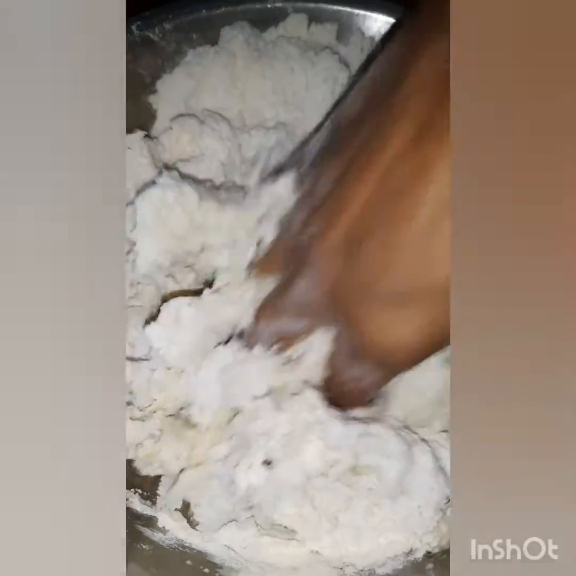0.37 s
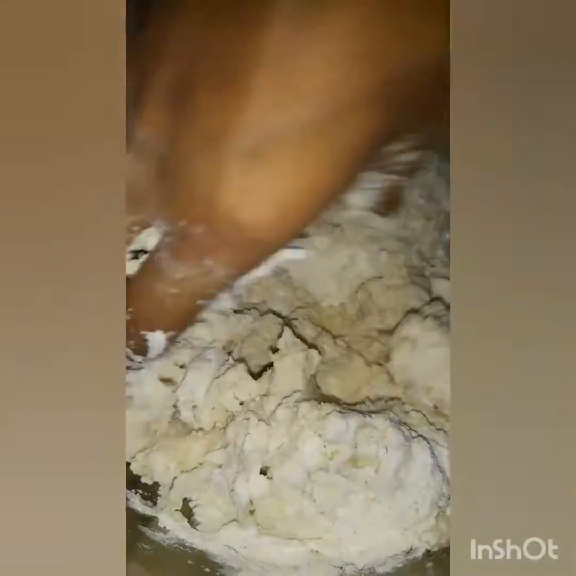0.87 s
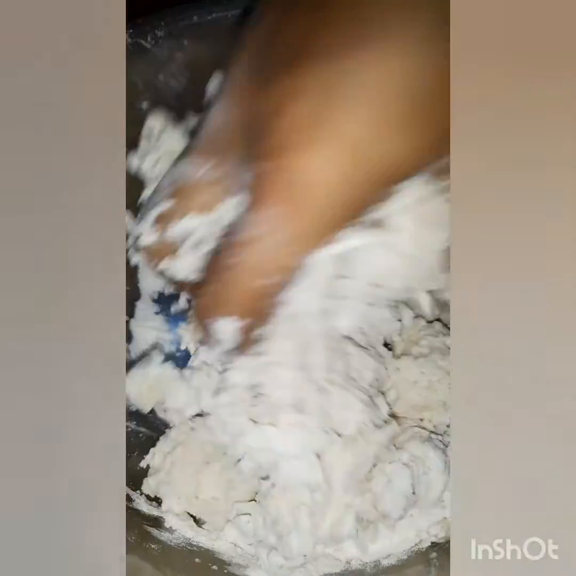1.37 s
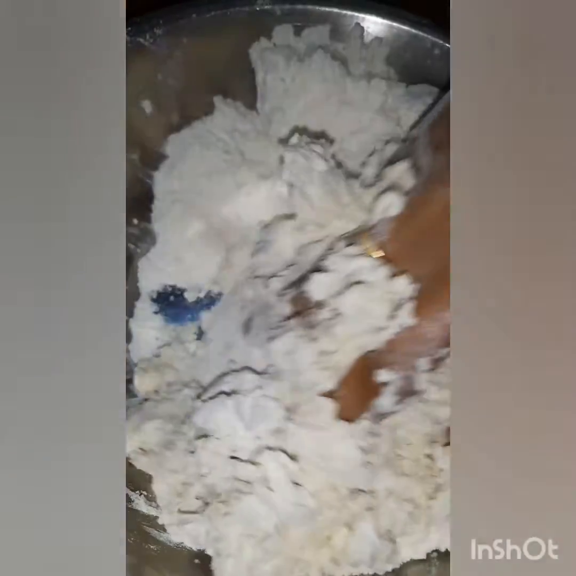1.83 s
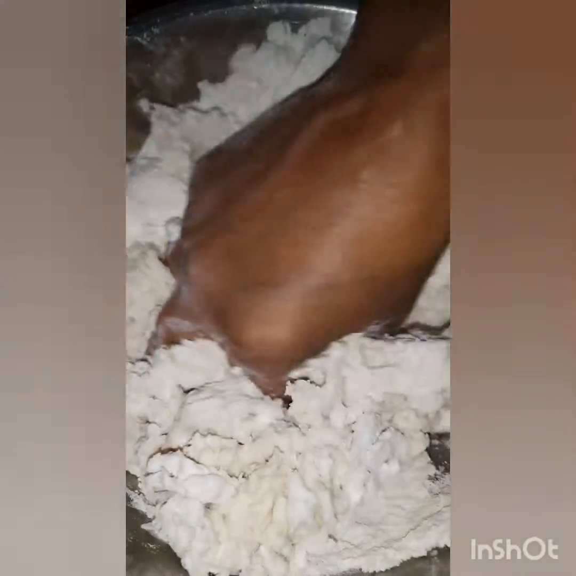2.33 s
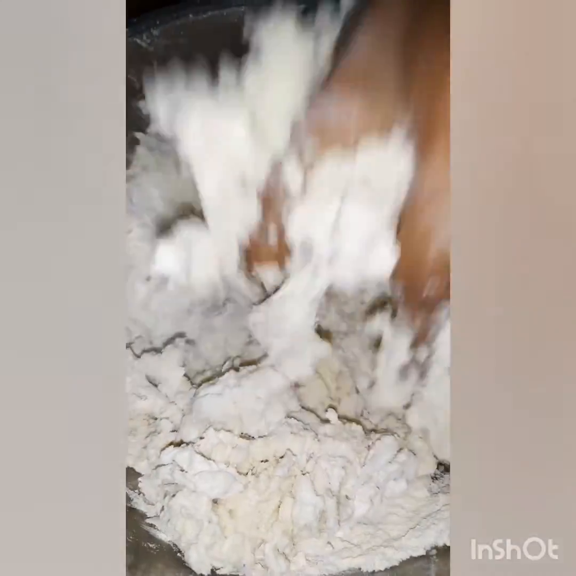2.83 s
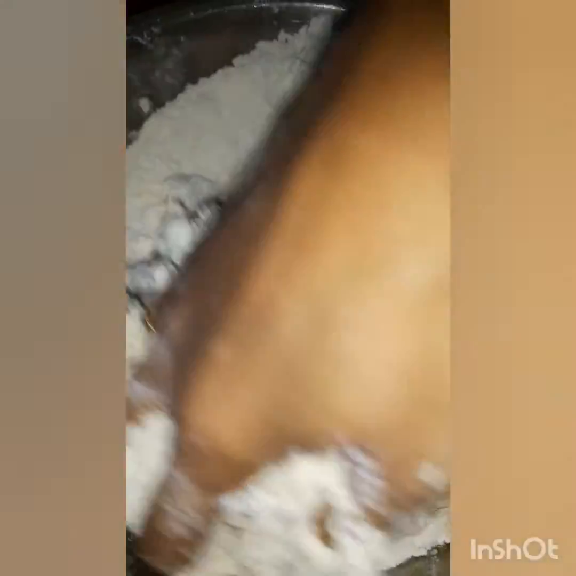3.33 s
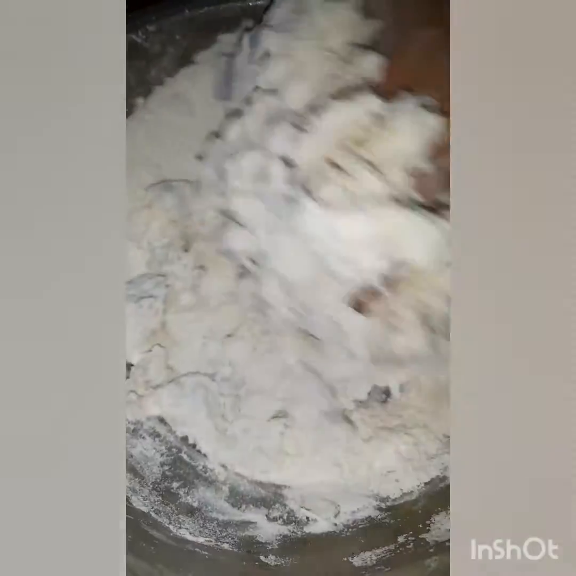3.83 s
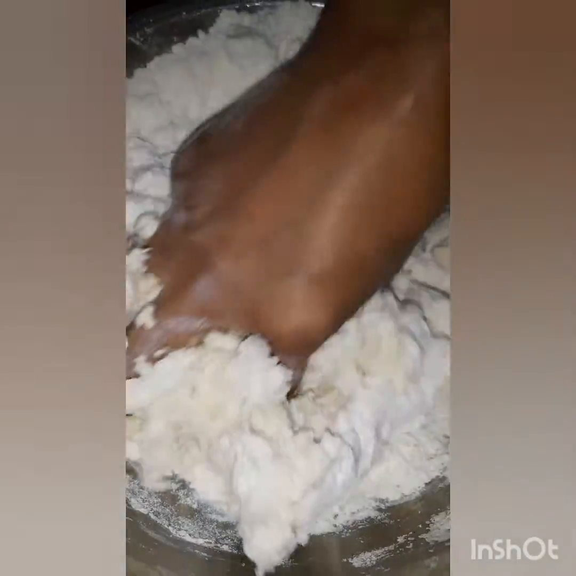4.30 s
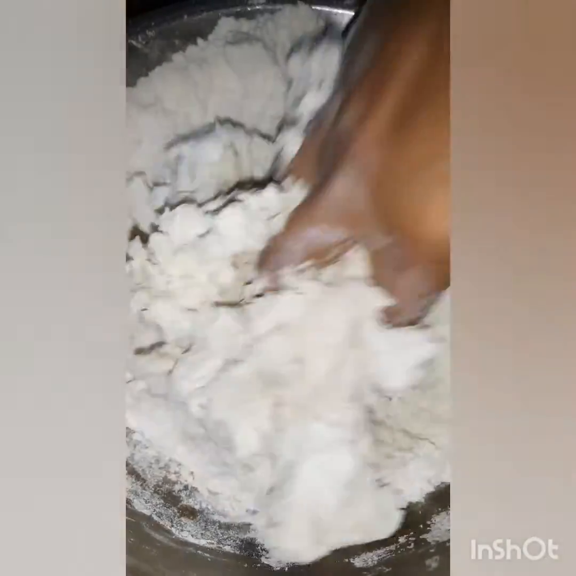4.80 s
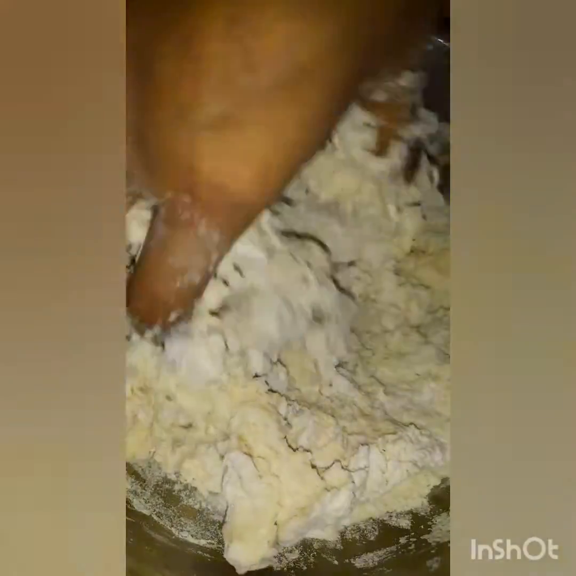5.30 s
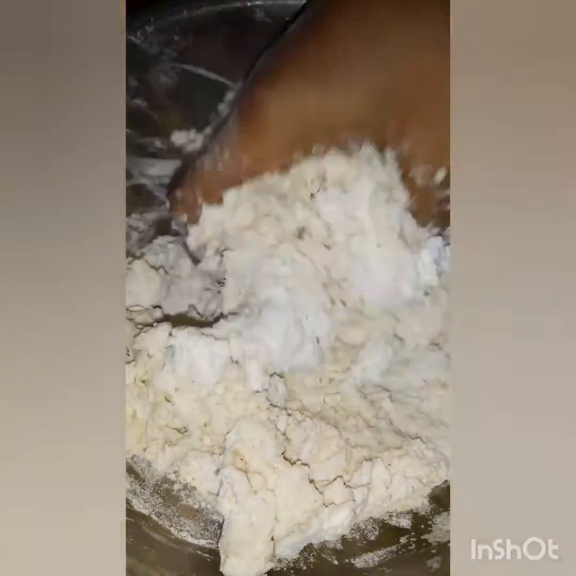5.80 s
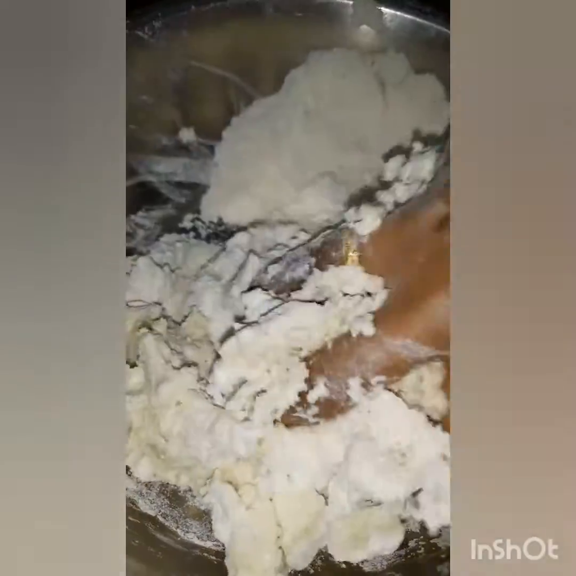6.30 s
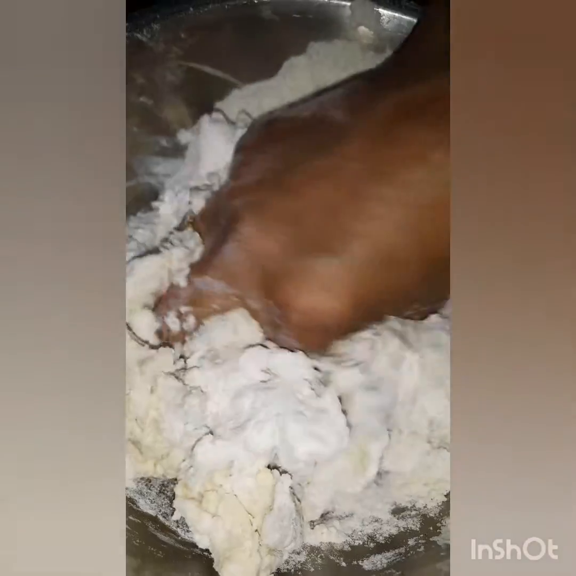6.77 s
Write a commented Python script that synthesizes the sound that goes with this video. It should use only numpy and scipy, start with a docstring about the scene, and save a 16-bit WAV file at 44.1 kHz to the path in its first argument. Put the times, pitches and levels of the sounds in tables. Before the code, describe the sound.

Close up in a quiet kitchen, a hand works crumbly dough in a steel bowl. Gritty strokes rustle and scrape in uneven bursts, dry crumbs crack, and the bowl knocks and thuds on the counter. Off to the right, something hard is tapped with a short ring and slight reverberation, in runs of about five a second. A low room hum stays underneath, and a faint squeak comes at the end.

```python
"""A hand kneads crumbly dough in a steel bowl on a kitchen counter, close to a two-port microphone. From the
start crumbs rustle and scrape on the steel (gritty noise under stroke envelopes) over a low hum; soon crumbs
crack, the bowl wall knocks and something clicks close on the right (short damped swings), and something hard is
tapped further off to the right, in runs about five a second (ringing clicks and reverberation). Then the bowl
thuds and booms (decaying modes), a palm swishes (resonant noise) and near the end a faint squeak joins (two
noise bands)."""
import sys
import numpy as np
from scipy import signal
from scipy.fft import rfft, irfft, next_fast_len
from scipy.io import wavfile
from scipy.ndimage import uniform_filter1d

SR = 44100
rng = np.random.default_rng(int(sys.argv[2]) if len(sys.argv) > 2 else 0)


def invert_db(level):
    """Linear amplitude ratio for a level in decibels (20 dB per decade), elementwise."""
    return 10 ** (np.asarray(level, dtype=float) / 20)


def log_audio(samples):
    """Write samples as a 16-bit WAV file to the path given in sys.argv[1]."""
    # one column per channel
    frames = np.atleast_2d(samples).T
    # limit to full scale, then quantise
    limited = np.clip(frames, -1, 1)
    pcm = np.round(limited * 32767).astype(np.int16)
    wavfile.write(sys.argv[1], SR, pcm)


N = 315314
SIZE = next_fast_len(N + SR)
HZ = np.arange(SIZE // 2 + 1) * SR / SIZE + 1  # 1 Hz up, so that log(HZ) exists


def on_hz(table):
    """A (hz, value) table interpolated over log frequency."""
    hz, value = np.transpose(table)
    return np.interp(np.log(HZ), np.log(hz), value)


def colour(x, gain):
    """Filter by a gain per frequency."""
    return irfft(rfft(x, SIZE) * gain, SIZE)[..., :N]


def unit(x):
    """Scale to rms 1."""
    return x / np.sqrt(np.mean(x ** 2))


def resonances(table):
    """Response of (hz, width_hz, level_db) resonators summed with alternating sign."""
    response = 0
    for k, (hz, width_hz, db) in enumerate(table):
        damping = 1j * HZ * width_hz
        response = response + (-1) ** k * invert_db(db) * damping / (hz ** 2 - HZ ** 2 + damping)
    return response


def as_widths(modes):
    """Decay times turned into resonance widths."""
    return [(hz, np.log(1000) / np.pi / t60_s, db) for hz, db, t60_s in modes]


def walk(rate_hz):
    """Random levels held 1 / rate_hz s and slewed twice."""
    k = int(SR / rate_hz)
    held = np.repeat(rng.standard_normal(N // k + 1), k)
    return uniform_filter1d(uniform_filter1d(held, k), k)[:N]


def grit(rate_hz, spread_db, share, decay_s):
    """Two unrelated noises, partly gated by the same random breaks of crumbs of unequal size."""
    breaks = rng.random(N) < rate_hz / SR
    size = breaks * invert_db(spread_db * np.minimum(rng.exponential(size=N), 4))
    burst = signal.lfilter([1], [1, -np.exp(-1 / (decay_s * SR))], size)
    return rng.standard_normal((2, N)) * (1 - share + share * unit(burst))


def envelope(full_s, hold_s, db, rise_db_s, sag_db_s, release_db_s):
    """Events that rise, sag while held and die away, added in power; one value per 64 samples."""
    t = np.arange(N // 64 + 2)[:, None] * 64 / SR - full_s
    rise = rise_db_s * np.minimum(t, 0)
    sag = sag_db_s * np.clip(t, 0, hold_s)
    release = release_db_s * np.maximum(t - hold_s, 0)
    gain = np.sqrt(np.sum(invert_db(db + rise - sag - release) ** 2, axis=1))
    return np.interp(np.arange(N) / 64, np.arange(len(t)), gain)


def add(out, s, x):
    """Mix a sound in at a time."""
    i = int(s * SR)
    out[..., i:i + x.shape[-1]] += x[..., :N - i]


def tail(t60_s, rise_s):
    """Two unrelated noise decays that build up as reflections arrive."""
    t = np.arange(SR // 2) / SR
    return rng.standard_normal((2, len(t))) * (1 - np.exp(-t / rise_s)) * invert_db(-60 * t / t60_s)


# likeness of the two ports: hz, correlation (0-1)
PORT_LIKENESS = [(30, 1), (90, 0.92), (300, 0.86), (600, 0.23), (1200, 0.07), (2500, 0.06), (8000, 0)]
# colour of the ports: hz, left_minus_right_db
PORT_TILT = [(60, -8), (110, 0.0), (200, -1.5), (380, -2), (700, 2.5), (1290, 1.0), (2380, -8.5),
             (4400, -2), (8120, 3), (15000, 2.5)]
ROOM_LAG_S = 0.00008  # diffuse sound reaches the left port first


def ports(pair):
    """A shared and a differing part reach the two ports, with their own lag and colour."""
    angle = np.arccos(np.clip(on_hz(PORT_LIKENESS), 0, 1)) / 2
    shared, other = rfft(pair, SIZE) * np.array([np.cos(angle), np.sin(angle)])
    lean = invert_db(on_hz(PORT_TILT) / 2) * np.exp(1j * np.pi * HZ * ROOM_LAG_S)
    return irfft(np.array([(shared + other) * lean, (shared - other) / lean]), SIZE)[:, :N]


# strokes of the hand through the dough: full_s, hold_s, fine_rustle_db, coarse_rustle_db, scrape_db
STROKES = [(0.0, 0.0082, -61, -56.5, -57.5), (0.14, 0.11, -74.5, -73, -83.5),
           (0.33, 0.13, -58, -66.5, -65.5), (0.88, 0.078, -64.5, -78, -84),
           (0.991, 0.121, -52.5, -57.5, -53.5), (1.142, 0.081, -54, -56, -59), (1.4, 0.45, -83, -81.5, -90),
           (1.8, 0.15, -65, -65, -69.5), (1.92, 0.14, -63, -63.5, -64), (2.097, 0.24, -63, -63.5, -65.5),
           (2.63, 0.15, -64, -66, -64.5), (3.0, 0.15, -80, -81, -79), (3.19, 0.1, -55, -61, -66.5),
           (3.32, 0.26, -52.5, -56.5, -62), (3.64, 0.18, -58.5, -61.5, -66.5), (3.85, .21, -58.5, -64, -69),
           (4.13, 0.39, -68.5, -67, -73.5), (4.6, 0.039, -73.5, -100, -69), (4.7, 0.1, -62.5, -63, -72),
           (4.9, 0.87, -74.5, -126, -91), (5.44, 0.13, -52, -62, -69), (5.58, 0.23, -54.5, -57.5, -59.5),
           (5.9, 0.022, -66.5, -71.5, -61.5), (6.1, 0.43, -75.5, -82.5, -73.5),
           (6.38, 0.019, -54.5, -60, -67), (6.476, 0.14, -62.5, -61, -61), (6.657, .19, -63, -63.5, -64),
           (6.92, 0.082, -73.5, -75, -74)]
# fine crumb spectrum: hz, density_db (per Hz)
FINE_CRUMBS = [(2650, -21.5), (4500, -4), (5550, 0.5), (6910, -2.5), (7950, -2.5), (9030, -3.5),
               (10300, -2), (14400, -5)]
# coarse crumb spectrum: hz, density_db (per Hz)
COARSE_CRUMBS = [(760, -23.5), (1300, -10.5), (1740, -7), (2100, -5), (2670, -13.5), (3790, -6),
                 (4800, -11), (6240, -36.5), (10600, -120)]
# bowl wall resonances, damped by dough: hz, width_hz, level_db
BOWL_WALL = [(427, 87, 1.5), (539, 115, 5), (591.3, 60, 6.5), (716, 103, -3.5), (932, 127, -2),
             (1100, 63, -2.5), (1292, 240, -10)]
RISE_DB_S, SAG_DB_S, RELEASE_DB_S = 290.5, 13, 215
SETTLE_DB, SETTLE_DB_S = -11, 72.5  # slower fall after each stroke
PUSH_DB, REST_DB = 1, -69  # counter rumble under the scrape and all the time
AFTER_DB, AFTER_S, AFTER_DB_S = -11, 0.044, 80.5  # rumble after each upper boom
SPLIT_HZ = 7200  # fine crumbs above and below flicker apart


def stroke_gain(full_s, hold_s, db):
    """Stroke envelope plus its slower settling, in power."""
    stroke = envelope(full_s, hold_s, db, RISE_DB_S, SAG_DB_S, RELEASE_DB_S)
    settling = envelope(full_s + hold_s, 0, db + SETTLE_DB, RISE_DB_S, 0, SETTLE_DB_S)
    return np.hypot(stroke, settling)


def kneading():
    """Crumbs rustle and flicker, dough drags on the bowl wall, the push rumbles in the counter."""
    full_s, hold_s, *levels = np.transpose(STROKES)
    fine_gain, coarse_gain, scrape_gain = [stroke_gain(full_s, hold_s, db) for db in levels]
    flicker = walk(22)

    fine = unit(colour(grit(250, 4, 0.2, 0.0015), invert_db(on_hz(FINE_CRUMBS))))
    lower = colour(fine, 1 / (1 + (HZ / SPLIT_HZ) ** 4))
    fine = lower * invert_db(1.8 * walk(12)) + (fine - lower) * invert_db(1.3 * walk(11))
    fine = fine * fine_gain * invert_db(2.97 * flicker + 0.46 * walk(40))

    coarse = unit(colour(grit(120.3, 4.4, 0.23, 0.0019), invert_db(on_hz(COARSE_CRUMBS))))
    coarse = coarse * coarse_gain * invert_db(1.27 * flicker + 2.7 * walk(11))

    scrape = unit(colour(grit(60, 3.8, 0.36, 0.003), resonances(BOWL_WALL)))
    scrape = scrape * scrape_gain * invert_db(1.48 * flicker + 4.6 * walk(9))

    thud_s, _, upper_db, _, _ = np.transpose(THUDS)
    after = envelope(thud_s + AFTER_S, 0, upper_db + AFTER_DB, RISE_DB_S, 0, AFTER_DB_S)
    push = np.sqrt((invert_db(PUSH_DB) * scrape_gain) ** 2 + after ** 2 + invert_db(REST_DB) ** 2)
    body = resonances(as_widths(UPPER_MODES)) + invert_db(-5) * resonances(as_widths(DEEP_MODES))
    rumble = unit(colour(rng.standard_normal((2, N)), body)) * push * invert_db(4.3 * walk(12))
    return fine + coarse + scrape + rumble


# room hum spectrum: hz, density_db (per Hz)
HUM_SPECTRUM = [(18, -34.5), (30, -12.5), (130, -9), (225, -1), (420, -26.5), (591, -14.5), (787, -29.5),
                (1470, -37.5), (2070, -35), (2620, -37.5), (3880, -27), (7260, -66.5), (8500, -36),
                (14000, -38), (15500, -31.5)]


def hum():
    """The steady floor of the room, coloured noise, wavers a little."""
    noise = unit(colour(rng.standard_normal((2, N)), invert_db(on_hz(HUM_SPECTRUM))))
    return noise * invert_db(-66.5 + 0.5 * walk(3.4))


# single crumbs that crack: start_s, level_db
CRACKS = [(0.1127, -45.5), (0.2644, -49), (0.849, -56), (0.872, -57), (2.19, -47), (2.7634, -43.5),
          (3.186, -41), (4.877, -50), (4.9023, -49), (4.9374, -55.5), (5.02, -52.5), (5.1204, -61),
          (5.19, -54), (5.2135, -56), (6.2173, -47.5), (6.9286, -47.5)]


def cracks():
    """A dry crumb snaps: a short burst of treble."""
    out, t = np.zeros((2, N)), np.arange(SR // 100) / SR
    for start_s, db in CRACKS:
        add(out, start_s, invert_db(db) * rng.standard_normal((2, len(t))) * np.exp(-t / 0.0017))
    return colour(out, invert_db(on_hz(FINE_CRUMBS)))


# short knocks on the bowl wall, and close clicks on the right (the rows with negative left_minus_right_db):
# peak_s, nearer_port_db, pitch_hz, length_cycles, left_minus_right_db
KNOCKS = [(0.1418, -37, 1940, 5, -12), (0.1414, -41, 4020, 9.3, -17), (0.3374, -29, 470, 0.92, 13),
          (0.3439, -33, 465, 4.4, 9), (1.0314, -40.5, 640, 2.7, 5), (1.0583, -40, 807.0, 2.6, 13),
          (1.0745, -37.5, 785, 1.8, 6), (1.0906, -38, 807.0, 2.9, 4), (1.1047, -37, 839.0, 2.3, 16),
          (1.1286, -35, 820, 1, 12), (1.2662, -25.5, 455, 0.64, 7.5), (1.994, -33.5, 403, 0.31, 18),
          (2.6324, -33, 1250, 1.2, 23), (3.8461, -34.5, 895, 0.29, 11), (4.1344, -39, 270, 2, 11),
          (4.2944, -34.5, 280, 0.84, 1), (4.6732, -16.5, 1016, 3.4, 7.5), (5.5364, -35.5, 770, 0.69, 14),
          (5.5648, -34, 820, 1.6, 12), (5.6409, -35, 814, 3.2, 12), (5.8191, -24.5, 593, 0.84, 11),
          (6.3624, -22.5, 330, 0.65, 4), (6.743, -48, 689.0, 1.3, -1.5), (7.0634, -32, 1690, 0.9, -15.5)]
PORT_LAG_S = 0.0002


def knocks():
    """A knock or close click swings briefly; the further port hears it weaker, later and longer."""
    out, lead = np.zeros((2, N)), SR // 100
    for peak_s, db, hz, cycles, pan_db in KNOCKS:
        far = np.array([[pan_db < 0], [pan_db > 0]])
        t = np.arange(-lead, 2 * lead) / SR - PORT_LAG_S * far
        # separate rise and fall; the overtone sharpens the first swing
        span_cycles = np.where(t < 0, 0.6, 0.48 * cycles * (1 + 0.58 * far))
        shape = np.exp(-(t * hz / span_cycles) ** 2)
        swing = np.cos(2 * np.pi * hz * t) + 0.065 * shape * np.cos(2 * np.pi * 2.05 * hz * t)
        add(out, peak_s - lead / SR, -invert_db(db - abs(pan_db) * far) * shape * swing)
    return out


# distant taps: start_s, level_db
TAPS = [(0.2084, -58), (0.2475, -63), (0.3252, -41), (0.5095, -51), (0.752, -57.5), (1.369, -56.5),
        (1.4721, -67), (1.9886, -49), (2.149, -42.5), (2.3007, -74), (2.3376, -57), (2.6314, -42),
        (2.807, -45.5), (2.9767, -52), (3.3494, -53), (3.5275, -41), (3.715, -44), (3.91, -45),
        (4.0606, -49.5), (4.2121, -56), (4.412, -61.5), (4.6234, -59.5), (5.7019, -44.5), (5.889, -41.5),
        (6.0919, -47), (6.278, -45.5), (6.4692, -42.5), (6.6533, -39.5), (6.8481, -45.5), (7.0499, -46)]
# resonances of the tapped thing: hz, width_hz, level_db
TAPPED_MODES = [(964, 320, -6.5), (1420, 250, -6.5), (2032, 102, 5), (2940, 190, -3.5), (3790, 350, 0),
                (5680, 725, -23), (10000, 5100, -17)]


def taps():
    """Hard taps from across the room: a short ring, stronger on the right, and reverberation."""
    clicks, wet = np.zeros((2, 2, N))
    for start_s, db in TAPS:
        # the click and its first reflections
        for lag_s, echo_db in (0, -4), (0.0021, -18.5), (0.0047, -15):
            add(clicks, start_s + lag_s, invert_db(db + echo_db) * np.ones((2, 1)))
        add(wet, start_s, invert_db(db) * tail(0.24, 0.001))
    direct = invert_db(np.array([[20], [29]])) * colour(clicks, resonances(TAPPED_MODES))
    # heard from all sides at once, the resonances blur into broad bands
    blurred = [(hz, 1.62 * width_hz, db) for hz, width_hz, db in TAPPED_MODES]
    reverb = ports(colour(wet, resonances(blurred)))
    return direct + invert_db(-2.5) * reverb * invert_db(np.array([[-1.5], [1.5]]))


def ring(modes, rise_s, hold_s, left):
    """One blow rings the modes, each with a chance strength, until the weight of the hand damps most of it."""
    t = np.arange(SR // 2) / SR
    x = np.zeros((2, len(t)))
    for hz, db, t60_s in modes:
        strength, turn = rng.standard_normal(2)
        phase = 2 * np.pi * hz * t
        x += invert_db(db + 2 * strength - 60 * t / t60_s) * np.sin([phase, phase + 3 * turn])
    x = x * (1 - np.exp(-t / rise_s)) * (left + (1 - left) / (1 + (t / hold_s) ** 8))
    return x / np.sqrt(np.mean(x[0, :SR // 25] ** 2))  # rms 1 over the first 40 ms


# bowl on the counter: start_s, deep_boom_db, upper_boom_db, clatter_db, hand_damps_after_s
THUDS = [(0.335, -46, -44.5, -47.5, 0.05), (0.351, -35.5, -43, -55, 0.19), (0.98, -68, -62, -74, 0.087),
         (1.03, -72, -54, -50, 0.091), (1.141, -54, -66, -71, 0.058), (1.265, -46.5, -43.5, -56.5, 0.075),
         (1.992, -50, -42, -55, 0.1), (2.576, -59.5, -54.5, -66, 0.03), (2.76, -54.5, -61.5, -86, 0.094),
         (2.822, -57.5, -87, -68.9, 0.022), (3.188, -61.5, -51.5, -55, 0.091),
         (3.845, -49, -42, -58.5, 0.085), (4.13, -52, -43, -58, 0.05), (4.293, -53.5, -50, -67.5, 0.052),
         (4.32, -48, -51, -62, 0.038), (4.562, -59.5, -56.5, -58.5, 0.15), (4.674, -44, -36, -37, 0.082),
         (5.817, -48.5, -43, -56, 0.1), (6.36, -53, -40.5, -49.5, 0.027), (6.378, -45, -40.5, -70, 0.035)]
# deep modes of counter and room: hz, level_db, t60_s
DEEP_MODES = [(103, 0.5, 0.26), (115.8, 5.5, 0.49), (149.5, -3, 0.28)]
# upper modes of counter and room: hz, level_db, t60_s
UPPER_MODES = [(189.9, -6, 0.12), (224.9, 2, 0.2), (240.6, -1, 0.28), (268, -1.5, 0.15), (303.8, -5, 0.18),
               (339, -5, 0.15)]


def thuds():
    """Each thud is a boom of counter and room and a dying clatter of the steel."""
    booms, clatter = np.zeros((2, 2, N))
    for start_s, deep_db, upper_db, clatter_db, hold_s in THUDS:
        deep = invert_db(deep_db) * ring(DEEP_MODES, 0.003, hold_s, 0.1)
        upper = invert_db(upper_db) * ring(UPPER_MODES, 0.004, hold_s, 0.13)
        add(booms, start_s, deep + upper)
        add(clatter, start_s, invert_db(clatter_db) * tail(0.28, 0.0009))
    steel = invert_db(16.5) * resonances(BOWL_WALL)
    # loose flour jumps with the blow and hisses
    flour = invert_db(on_hz(FINE_CRUMBS) - 21) * (HZ / SPLIT_HZ) ** 1.3
    return ports(booms + colour(clatter, steel + flour))


# swishes of the palm: middle_s, length_s, level_db
SWISHES = [(0.9, 0.055, -76), (0.998, 0.12, -60.5), (3.191, 0.025, -60), (5.164, 0.014, -72.5),
           (5.302, 0.037, -76.5), (5.433, 0.13, -65.5), (5.52, .03, -61), (6.391, 0.065, -58)]
# the resonance they linger on: hz, width_hz, level_db
SWISH_MODE = [(5510, 520, 0)]


def swishes():
    """A sliding palm makes one high resonance sing for a moment."""
    t = np.arange(N) / SR
    shape = sum(invert_db(db) * np.exp(-(2 * (t - s) / length_s) ** 2) for s, length_s, db in SWISHES)
    return unit(colour(rng.standard_normal((2, N)), resonances(SWISH_MODE) ** 2)) * shape


# level of the squeak: time_s, level_db
SQUEAK_LEVEL = [(6.6, -93), (6.7, -75), (6.97, -77), (7.02, -74.5), (7.06, -67), (7.075, -87.5)]
# its tone and octave: hz, width_hz, level_db
SQUEAK_TONES = [(950, 65, -3), (1920, 50, -2.5)]


def squeak():
    """A thin breathy tone, with its octave, both narrow noise, stronger on the right."""
    time_s, db = np.transpose(SQUEAK_LEVEL)
    tone = unit(colour(rng.standard_normal(N), resonances(SQUEAK_TONES) ** 2))
    level_db = np.interp(np.arange(N) / SR, time_s, db, -140, -140)
    return tone * invert_db(level_db + np.array([[-4], [4]]))


def scene():
    """All sources at the two ports."""
    diffuse = ports(kneading() + hum() + swishes())
    return diffuse + cracks() + knocks() + taps() + thuds() + squeak()


def top_cut(x):
    """Nothing passes above the cut-off."""
    return signal.sosfilt(signal.butter(12, 15900, fs=SR, output="sos"), x)


# microphone response: hz, gain_db
MIC_RESPONSE = [(40, -4), (75, 0), (6500, -0.5), (7300, -1), (8000, 1), (14400, 1), (14800, -8),
                (15750, -10), (15900, -35.5)]
END_S, FADE_S = 7.08, 0.00074


def record(dry):
    """The microphone loses the lowest bass, dips and rolls off in the treble; sound stops just before the end."""
    fade = np.clip((END_S - np.arange(N) / SR) / FADE_S, 0, 1)
    mix = colour(dry, invert_db(on_hz(MIC_RESPONSE))) * fade
    return top_cut(mix)


dry = scene()
out = record(dry)
log_audio(out)
```